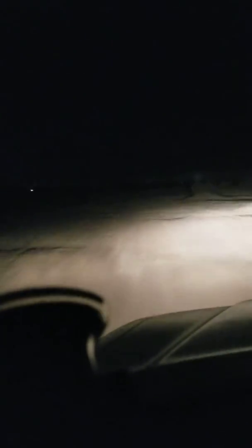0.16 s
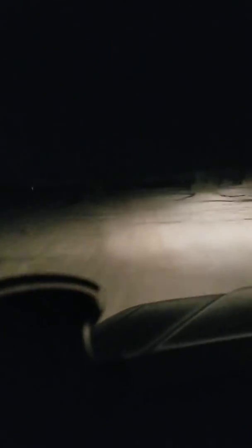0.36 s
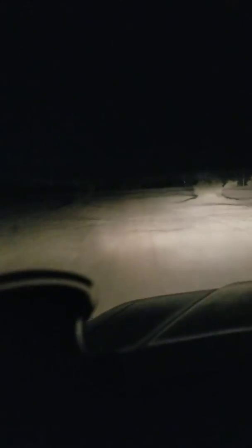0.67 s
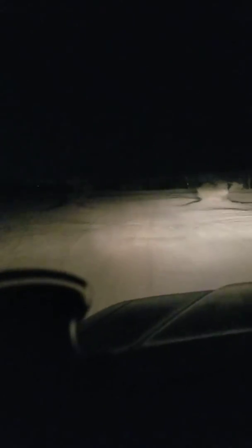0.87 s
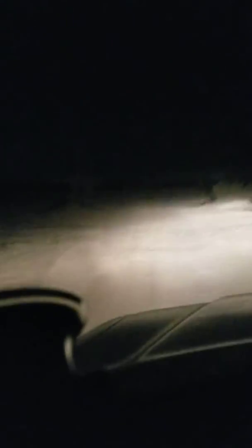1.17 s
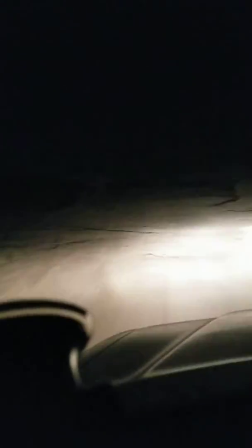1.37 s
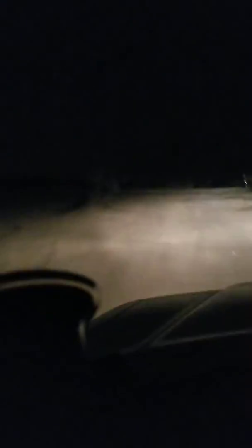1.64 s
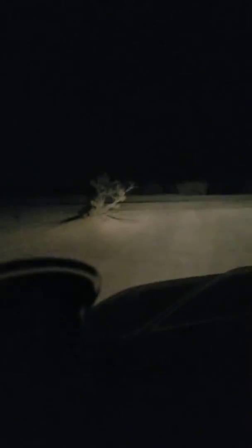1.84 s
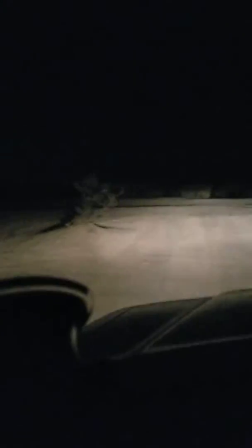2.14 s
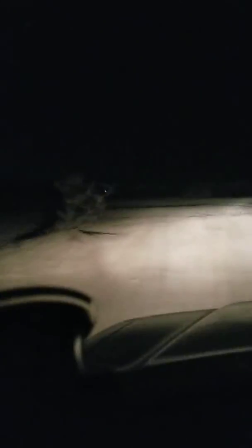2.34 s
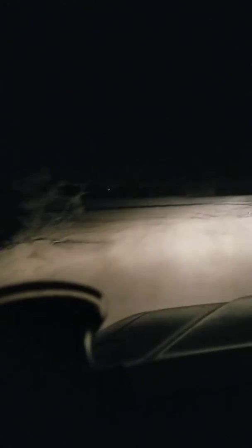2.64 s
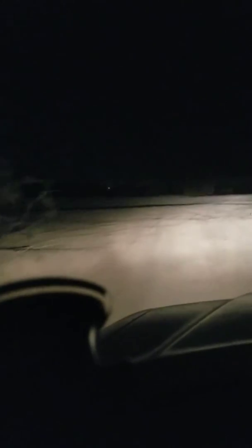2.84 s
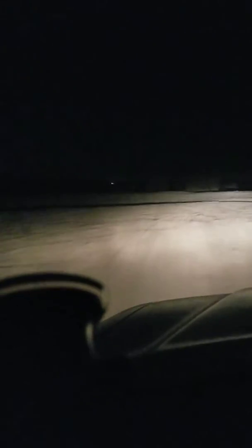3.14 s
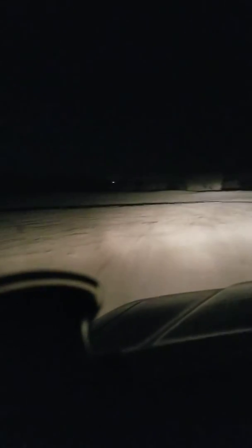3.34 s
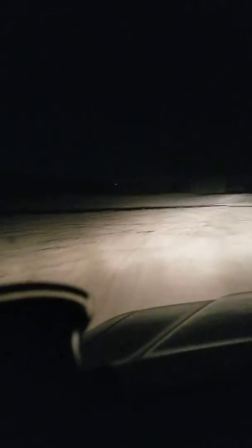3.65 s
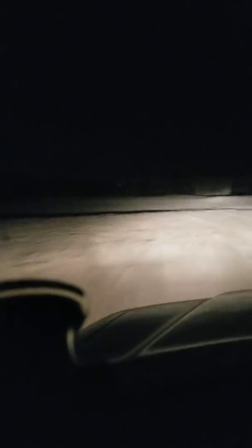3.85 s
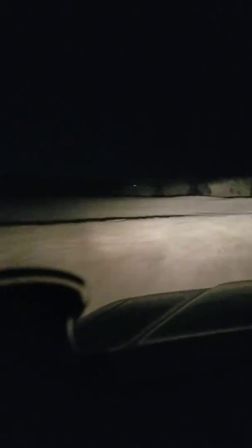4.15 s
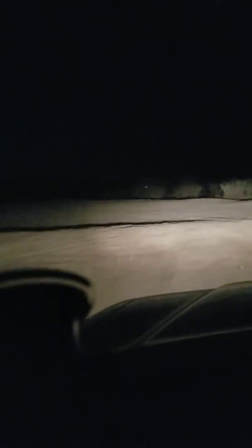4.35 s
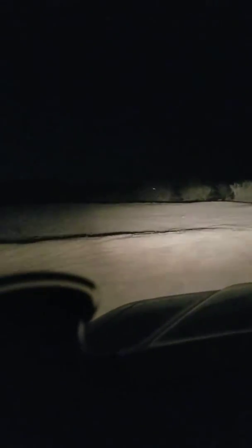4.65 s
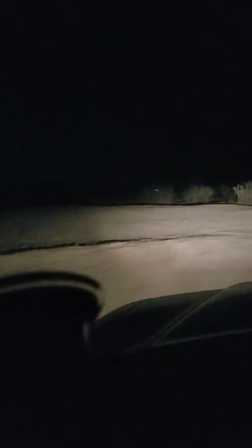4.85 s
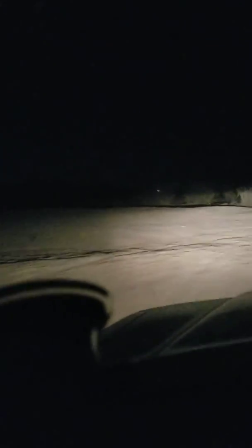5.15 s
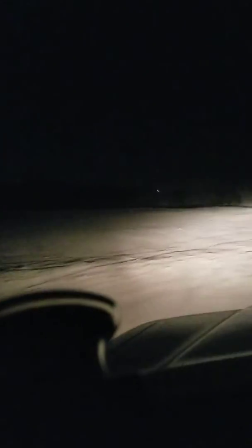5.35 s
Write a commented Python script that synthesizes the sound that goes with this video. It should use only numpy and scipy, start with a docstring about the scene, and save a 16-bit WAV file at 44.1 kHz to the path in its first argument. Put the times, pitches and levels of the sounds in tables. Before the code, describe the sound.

Low booming cabin rumble of a car jolting over ruts and stones, with faint grit crunch, trim rattles and small thuds.

```python
"""Inside a car rolling over a rough dirt road, heard on a phone near the windscreen.
Ruts make the cabin boom, stones drum through the tyres, pebbles thud and grit crunches under the floor.
These are showers of random impacts, coloured by the cabin and made louder in the ruts.
Bumps swing panels as damped tones, and the suspension clunks as dull noise bursts with a short ring.
Loose trim knocks and ticks as filtered bursts, a small metal part rings thinly, and cloth rustles as noise."""
import sys
import numpy as np
from scipy import signal
from scipy.fft import rfft, irfft, next_fast_len
from scipy.io import wavfile
from scipy.ndimage import uniform_filter1d

SR = 44100
rng = np.random.default_rng(int(sys.argv[2]) if len(sys.argv) > 2 else 0)


def put_to_file(sound):
    """Save the sound as 16-bit audio at rate SR, in the file named by the first command-line argument."""
    columns = np.atleast_2d(sound).T  # one column per channel
    safe = np.clip(columns, -1, 1)
    whole_steps = np.round(safe * 32767)
    wavfile.write(sys.argv[1], SR, whole_steps.astype(np.int16))


N = 242991
TIME = np.arange(N) / SR
SIZE = next_fast_len(N + SR // 2, real=True)  # with room for sounds to ring out
FREQ = np.maximum(np.arange(SIZE // 2 + 1) * SR / SIZE, 1)
TOP_HZ = 15900  # the phone passes nothing much above this


def undb(db):
    """Decibels to gain."""
    return 10 ** (np.asarray(db) / 20)


def unit(x):
    """Scale to an rms of one."""
    return x / np.sqrt(np.mean(np.abs(x) ** 2))


def over_hz(points):
    """Points joined by straight lines on a log-frequency axis."""
    hz, value = np.transpose(points)
    return np.interp(np.log(FREQ), np.log(hz), value)


def peaks_db(modes):
    """The peaks that resonances add to whatever shakes them."""
    return sum(db / (1 + (2 * (FREQ - hz) / width) ** 2) for hz, width, db in modes)


def through(x, response):
    """Filter by a frequency response."""
    return irfft(rfft(x, SIZE) * response, SIZE)[..., :N]


def causal(db):
    """Response with these levels that rings only after the blow."""
    cepstrum = irfft(np.log(undb(db)))
    half = len(cepstrum) // 2
    # fold the part before the blow onto the part after it
    cepstrum[1:half] *= 2
    cepstrum[half + 1:] = 0
    return np.exp(rfft(cepstrum))


def walk(rate):
    """Random levels that wander about `rate` times a second, with an rms of one."""
    hold = max(int(SR / rate), 2)
    steps = np.repeat(rng.standard_normal(N // hold + 1), hold)
    return unit(uniform_filter1d(steps, hold)[:N])


def add(out, start, sound):
    """Mix a sound in at a time."""
    first = max(int(start * SR), 0)
    part = out[..., first:first + sound.shape[-1]]
    part += sound[..., :part.shape[-1]]


def stones(rate, spread_db, cap=4):
    """Random impacts of uneven size, `rate` a second on average, as two unrelated pushes."""
    hit = rng.random(N) < rate / SR
    size = undb(spread_db * np.minimum(rng.exponential(size=N), cap))
    return hit * size * rng.standard_normal((2, N))


# resonances of the cabin: pitch_hz, width_hz, boost_db
CABIN_MODES = [(98.2, 11.3, 4.5), (174.5, 20, 1), (324, 69, -1), (384.4, 15, 3), (564, 23, 2.5)]
# which microphone hears more: pitch_hz, left_minus_right_db
LEAN = [(40, 1.1), (110, 1), (200, 3.2), (500, 4.1), (1500, 5.5), (3000, 0), (4800, 5.5), (7000, 3),
        (11000, 1), (15000, 4.4)]
# how alike the two microphones hear: pitch_hz, likeness (0-1)
LIKENESS = [(40, 1), (110, 0.94), (250, 0.85), (420, 0.86), (560, 0.53), (720, 0.16), (950, 0.092),
            (1300, 0.22), (2600, 0.17), (8000, 0.055)]


def cabin(pair, colour):
    """Colour a pair of pushes; long waves reach both microphones alike, short ones do not."""
    alike = np.clip(over_hz(LIKENESS), 0, 1)
    response = causal(over_hz(colour) + peaks_db(CABIN_MODES))
    mid, side = through(pair, response * np.sqrt([1 + alike, 1 - alike]))
    lean_db = over_hz(LEAN) / 2
    return through(np.array([mid + side, mid - side]), undb([lean_db, -lean_db]))


def swells(table, axis, attack_s, release_s):
    """Summed power of events that rise, hold until their length is over and die away."""
    power = np.zeros(N)
    for row in table:
        age = TIME - row[0]
        rise = np.clip(age / attack_s, 0, 1)
        fall = np.exp(-np.maximum(age - row[-1], 0) / release_s)
        power += (undb(row[axis]) * rise * fall) ** 2
    return power


# roughness of the road, as the level of the steady shaking: time_s, level_db
ROAD = [(0.0, -16.5), (0.24, -19.5), (2.12, -22), (2.26, -20.5), (3.57, -24.5), (3.99, -22.5),
        (5.13, -27.5), (5.45, -25.5)]


def road_level():
    """Shaking by the steady road in dB, joined by straight lines in time."""
    rows = np.array(ROAD)
    return np.interp(TIME, rows[:, 0], rows[:, 1])


RUT_ATTACK_S, RUT_RELEASE_S = 0.011, 0.048
# the wheels cross a rut or a stony patch: start_s, boom_db, drum_db, grit_db, length_s
RUTS = [(.04, -28, -24.5, -70, 0.23), (.27, -20, -23.5, -46, 0.13), (.44, -24, -27, -45.5, 0.073),
        (.67, -27.5, -20.5, -44.5, 0.078), (.75, -41, -28.5, -56, 0.07), (.85, -23, -25, -70, 0.049),
        (1.04, -22, -39, -44.5, 0.099), (1.31, -19.5, -27, -75, 0.076), (1.44, -25, -24, -51, 0.057),
        (1.56, -35, -22, -61, 0.045), (1.68, -44, -39, -48, 0.3), (1.96, -47, -49, -39, 0.056),
        (2.05, -19, -49, -42, 0.015), (2.12, -25, -26, -63, 0.039), (2.3, -52, -19.5, -46, 0.091),
        (2.43, -25, -28, -52, 0.042), (2.6, -25, -29.5, -77, 0.16), (2.72, -23.5, -34, -46, 0.091),
        (2.97, -23.5, -31.5, -53, 0.13), (3.14, -31.5, -56, -51.5, 0.18), (3.52, -27.5, -36.5, -55, 0.19),
        (3.76, -45, -24.5, -51.5, 0.15), (3.95, -25, -23, -59, 0.19), (4.33, -23.5, -25.5, -58, 0.11),
        (4.5, -27, -30, -55.5, 0.15), (4.78, -23.5, -30, -68, 0.05), (5.17, -27, -40, -55, 0.061),
        (5.33, -26.5, -35, -46, 0.054), (5.46, -24, -30, -46.5, 0.11)]


def with_ruts(steady_db, axis):
    """Level in dB of the steady road with the surges of the ruts on top."""
    return 10 * np.log10(undb(steady_db) ** 2 + swells(RUTS, axis, RUT_ATTACK_S, RUT_RELEASE_S))


def rumble(colour, level_db, rate, spread_db, even_s):
    """Impacts shake the body; their own ups and downs are evened out so the road sets the level."""
    shake = cabin(stones(rate, spread_db), colour)
    power = uniform_filter1d(np.mean(shake, axis=0) ** 2, max(int(even_s * SR), 2))
    return shake / np.sqrt(power + 1e-18) * undb(level_db)


BOOM_DB = -4.5  # against the steady shaking
# tone colour of the cabin boom: pitch_hz, relative_level_db
BOOM = [(12, -52.5), (22, -8), (34, 5), (60, 5.5), (80, 6.5), (125, 2.5), (160, -28), (280, -120)]


def cabin_boom(road_db):
    """Ruts shake the whole body, and the cabin booms in the deep bass."""
    return rumble(BOOM, with_ruts(road_db + BOOM_DB, axis=1), rate=600, spread_db=1, even_s=0.051)


DRUM_DB = -8  # against the steady shaking
# tone colour of the tyre drumming: pitch_hz, relative_level_db
DRUM = [(59, -28), (100, -1.5), (177, -1.5), (242, -12.5), (316, -16), (351, -26), (392, -22.5),
        (520, -38.5), (680, -56), (1140, -120)]


def tyre_drumming(drum_db):
    """Stones drum through the tyres, above the boom in pitch."""
    return rumble(DRUM, drum_db, rate=1100, spread_db=1.02, even_s=0.047)


PEBBLE_DB, NOMINAL_DRUM_DB = -46, -27  # the thuds have the first level when the drumming has the second
PEBBLE_DB_PER_DB = 0.28  # how the thuds grow with the drumming
# tone colour of the pebbles: pitch_hz, relative_level_db
PEBBLES = [(150, -26), (260, 1), (330, 9), (450, 3.5), (580, -6.5), (750, -12), (1300, -32.5), (3000, -71)]
# stony stretches where pebbles roar under the floor: start_s, level_db, length_s
STONY = [(.02, -38, .07), (.27, -36, 0.13), (.8, -43, .08), (1.26, -35, 0.02), (2.31, -37.5, 0.16),
         (2.72, -41.5, .1), (4.03, -41, 0.12), (4.34, -41.5, 0.058)]


def pebbles(drum_db):
    """Pebbles thud under the treads, harder where the tyres drum; on stony stretches they merge into a roar."""
    thuds = unit(cabin(stones(rate=260, spread_db=1.6), PEBBLES))
    thud_db = PEBBLE_DB + PEBBLE_DB_PER_DB * (drum_db - NOMINAL_DRUM_DB)
    roar = unit(cabin(stones(rate=700, spread_db=2.5), PEBBLES))
    stony_power = swells(STONY, axis=1, attack_s=RUT_ATTACK_S, release_s=RUT_RELEASE_S)
    return roar * np.sqrt(stony_power) + thuds * undb(thud_db)


SMOOTH_ROAD_DB, GRIT_DB = -24.5, -23  # at this shaking the steady grit lies GRIT_DB against it
GRIT_DB_PER_DB = 0.92  # how the grit grows with the shaking
# tone colour of the grit: pitch_hz, relative_level_db
GRIT = [(350, -4.5), (480, 1), (620, 1.5), (800, -2.5), (930, 1), (1150, -7.5), (1350, -5.5), (1700, -10.5),
        (2500, -15), (3200, -20), (4600, -19.5), (6000, -24.5), (7600, -25.5), (8800, -37), (12000, -30)]


def gravel(road_db):
    """Grit crunches unevenly under the tread, harder on rough ground and in the ruts."""
    crunch = unit(cabin(stones(rate=6000, spread_db=-1.5), GRIT))
    steady_db = SMOOTH_ROAD_DB + GRIT_DB + GRIT_DB_PER_DB * (road_db - SMOOTH_ROAD_DB)
    uneven_db = 1.07 * walk(rate=68) + 0.96 * walk(rate=14)
    return crunch * undb(with_ruts(steady_db, axis=3) + uneven_db)


CLOTH_DB = -63.5  # the rustle at rest
SWAY_ATTACK_S, SWAY_RELEASE_S = .04, .11
# tone colour of the rustle: pitch_hz, relative_level_db
RUSTLE = [(2500, 1), (4800, 3), (7500, 2), (8800, -4), (11000, 4), (15800, 1)]
# the car sways and cloth shifts: start_s, level_db, length_s
SWAYS = [(.09, -54, 0.14), (.25, -52.5, 0.085), (.44, -51, 0.032), (1.05, -62, .04), (1.22, -57, 0.082),
         (1.52, -53.5, 0.1), (1.87, -59, 0.21), (2.24, -57, 0.15), (2.37, -54, 0.26), (2.68, -57, 0.14),
         (2.91, -63, 0.068), (3.16, -56.5, 0.045), (3.86, -56, 0.24), (4.42, -60.5, 0.098),
         (4.67, -55.5, 0.19), (4.835, -50.5, 0.11), (4.98, -54.5, 0.22), (5.18, -56, 0.15),
         (5.43, -50, 0.032)]
# cloth sliding on a seat: middle_s, level_db, length_s, pitch_hz
SLIDES = [(0.248, -59, 0.43, 4800), (1.903, -54, 0.1, 4700), (2.44, -60.5, 0.16, 4900),
          (3.292, -61, 0.12, 4400), (3.834, -60.5, 0.37, 5900), (4.73, -64, 0.81, 4600)]


def cloth():
    """Cloth rustles as the car sways; slides hiss in a narrow band and near its octave."""
    sway_power = swells(SWAYS, axis=1, attack_s=SWAY_ATTACK_S, release_s=SWAY_RELEASE_S)
    sway = np.sqrt(undb(CLOTH_DB) ** 2 + sway_power)
    rustle = unit(cabin(stones(rate=42000, spread_db=2.5), RUSTLE)) * sway * undb(1.5 * walk(rate=26))
    for middle, db, length, hz in SLIDES:
        band = 1 / (1 + ((FREQ - hz) / 450) ** 2)
        band += undb(-17) / (1 + ((FREQ - 2.1 * hz) / 900) ** 2)
        hiss = unit(through(rng.standard_normal((2, N)), band))
        swell = undb(db) * np.exp(-(2 * (TIME - middle) / length) ** 2)
        rustle = rustle + swell * hiss * undb([[2.5], [-2.5]])  # stronger on the left
    return rustle


# thin rings of a jolted small metal part: start_s, level_db, pitch_hz, time_to_fall_60_db_s
CHINK = [(4.861, -53, 12130, .35), (4.861, -60, 12600, .5), (4.861, -60, 11190, .4),
         (4.861, -64, 13150, .8), (5.3, -66, 13150, .4)]


def chink():
    """A thin metallic ring that dies slowly."""
    out = np.zeros(N)
    for start, db, hz, t60 in CHINK:
        add(out, start, undb(db - 60 * TIME / t60) * np.sin(2 * np.pi * hz * TIME))
    return out


# bumps that swing a body panel: start_s, level_db (before a common cut), pitch_hz, length_s
BUMPS = [(.36, -6.5, 177.3, 0.041), (1.063, -2, 61.6, 0.084), (1.56, -9, 175, 0.063),
         (2.304, -0.5, 137, 0.023), (2.335, -8.5, 176.6, 0.14), (2.722, -6.5, 58, 0.1),
         (2.733, -1.5, 107, 0.024), (3.998, -18, 428, 0.019), (4.012, -10.5, 115.5, 0.062),
         (4.373, -9.5, 101, 0.033), (5.343, -11.5, 211.7, 0.036), (5.367, -24, 220.4, 0.14)]


def bumps():
    """Each bump swings a panel: a quick swell and a damped fall."""
    out = np.zeros(N)
    t = TIME[:SR // 2]
    for start, db, hz, length in BUMPS:
        age = t / (length * 0.35)  # the swing is widest when this reaches one
        swing = (age * np.exp(1 - age)) ** 2
        add(out, start, undb(db - 7.5) * swing * np.sin(2 * np.pi * hz * t))
    return out * undb([[.8], [-.8]])  # slightly stronger on the left


CONTACT_RISE_S = .002  # how fast the contacts build up


def chatter(length, tail_db, tail_s, grain_db):
    """A burst of tiny contacts and its short cabin echo, with the energy of unit rms over its length."""
    t = TIME[:SR // 8]
    grains = np.repeat(rng.standard_normal(len(t)), SR // 2000)[:len(t)]  # about 2000 a second
    burst = (1 - np.exp(-t / CONTACT_RISE_S)) * np.exp(-(t / length) ** 2) * undb(grain_db * grains)
    echo = undb(tail_db) * np.exp(-t / tail_s) * (1 - np.exp(-2 * t / length))
    sound = (burst + echo) * rng.standard_normal((2, len(t)))
    return unit(sound) * np.sqrt(length * SR / len(t))


CLUNK_RISE_S, CLUNK_RING_S = 0.0015, 0.0092  # the ring swells and dies away
CLUNK_SAG, CLUNK_SAG_S = .07, .012  # a struck panel starts this share sharp and relaxes in this time
# tone colour of the blows: pitch_hz, relative_level_db
CLUNK = [(150, 7), (300, 11), (420, 6.5), (600, -2.5), (1000, -1.5), (1500, -13.5), (2400, -31),
         (5000, -62)]
# suspension clunks, each ringing a floor panel: start_s, blow_db, length_s, pitch_hz, ring_peak_db (on the left)
CLUNKS = [(0.15, -56, .006, 308, -34), (0.215, -35, 0.0039, 750, -34), (0.365, -34, 0.036, 294, -20.5),
          (0.393, -36, 0.006, 586, -30), (0.77, -41, 0.029, 546, -31.5), (1.553, -37, 0.038, 310, -22.5),
          (1.727, -41, 0.019, 613, -32), (2.348, -34, 0.0049, 556, -27), (2.4, -46, 0.0096, 557, -32),
          (2.447, -44, 0.012, 296, -19.5), (2.729, -43, 0.015, 684, -32.5),
          (2.834, -34.5, 0.012, 274, -22.5), (3.989, -32.5, 0.019, 570, -32),
          (4.32, -31.5, 0.0047, 636, -44), (4.358, -56, 0.018, 307, -24.5), (4.791, -42, 0.012, 315, -26),
          (5.027, -30.5, 0.0037, 440, -48), (5.315, -29.5, 0.033, 426, -27)]


def clunks():
    """The suspension strikes its rubber stops: dull blows through the floor, each with a short solid ring."""
    blows, rings = np.zeros((2, N)), np.zeros(N)
    t = TIME[:SR // 8]
    swell = (1 - np.exp(-t / CLUNK_RISE_S)) * np.exp(-t / CLUNK_RING_S)
    swell = swell / swell.max()
    relaxing = t + CLUNK_SAG * CLUNK_SAG_S * (1 - np.exp(-t / CLUNK_SAG_S))
    for start, db, length, hz, ring_db in CLUNKS:
        blow = chatter(length, tail_db=-13, tail_s=.025, grain_db=4)
        add(blows, start, undb(db) * blow)
        add(rings, start, undb(ring_db) * swell * np.sin(2 * np.pi * hz * relaxing))
    return unit(cabin(blows, CLUNK)) * np.std(blows) + rings * undb([[0], [-4]])


SPOT_DB = 2  # how much the struck spot changes the colour


def rattles(table, dry, ringing, blow_db, tail_db, tail_s, grain_db):
    """A loose part strikes its seat once and chatters on; the contact's hardness picks the pitch region."""
    out, count = np.zeros((2, N)), 2 * (SR // 10)
    hz = np.maximum(np.fft.rfftfreq(count, 1 / SR), 1)
    # shorten both responses to the span of one rattle
    dry, ringing = (unit(rfft(irfft(response, SIZE)[:count])) for response in (dry, ringing))
    for start, db, length, centre_hz, focus_db, pan_db in table:
        length = max(length, .001)
        force = chatter(length, tail_db, tail_s, grain_db)
        force[:, SR // 1000] += undb(blow_db) * np.sqrt(length * SR)  # the first blow, at 1 ms
        # light touches clatter drily; hard blws set the whole panel ringing
        share = np.interp(db, [-40, -32], [.3, 1])
        mix = (1 - share) * dry + share * ringing
        octaves = np.minimum(np.abs(np.log2(hz / centre_hz)), 2)
        # every blow lands on another spot, which favours other resonances
        spot_db = SPOT_DB * np.interp(hz, np.geomspace(300, TOP_HZ, 40), rng.standard_normal(40))
        colour = unit(mix * causal(focus_db * octaves + spot_db))
        sound = irfft(rfft(force, count) * colour, count) / np.hypot(1, undb(blow_db))
        add(out, start, sound * undb([[db + pan_db / 2], [db - pan_db / 2]]))
    return out


BENDING_S = .0075  # the most that the bass of a knock lags behind its treble
# tone colours of knocks and of ticks: pitch_hz, relative_level_db
KNOCK = [(400, -12), (900, 12.5), (1500, 1.5), (2400, 0), (3050, -3), (3800, -5.5), (4600, -2),
         (5400, -7.5), (6500, -11), (7800, -10), (9000, -18), (15000, -14.5)]
TICK = [(1500, -2), (3000, 0.5), (4000, 7.5), (5200, 2.5), (6300, -1), (7500, -0.5), (9000, -9),
        (11000, -0.5), (13500, 0.5), (16000, 1)]
# resonances of the panels and of the small hard parts: pitch_hz, width_hz, boost_db
TRIM_MODES = [(700, 160, 4), (1000, 90, 13), (1319, 110, 4), (1650, 240, 3), (2030, 110, 10),
              (2420, 170, 9), (2615, 130, 10), (3170, 90, 3), (3480, 240, 5), (4250, 190, 10),
              (4560, 190, 7), (5450, 400, 5)]
TICK_MODES = [(3400, 400, 4), (4200, 300, 2), (4720, 300, 3), (5400, 700, 3), (6300, 300, 4),
              (8970, 300, 8), (12900, 500, 4)]
# loose trim knocking, then small hard parts ticking and scraping, both with the columns:
# start_s, level_db, length_s, centre_hz, change_db_per_octave (away from the centre), left_minus_right_db
KNOCKS = [(0.216, -42, .002, 900, -7, 0), (0.335, -51, .012, 2800, -10, 2),
          (0.365, -49.5, 0.027, 2600, -10, 0), (0.469, -45, .012, 2500, 0, 9),
          (0.836, -40, .012, 2670, -4, 4.5), (1.116, -45, 0.007, 3520, -25, 5),
          (1.127, -48, 0.013, 3350, -18, 2), (1.241, -40, .008, 1620, -12, 7.5),
          (1.537, -48, 0.013, 4080, -7, 4), (1.979, -40, 0.0079, 3320, -7, 2),
          (1.987, -39, .006, 3000, -6, 5), (2.011, -37, 0.0087, 3200, -5, -1),
          (2.062, -42.5, .0065, 2180, -3, 10), (2.206, -28.5, 0.0083, 3160, -5.5, 4),
          (2.224, -38, .011, 1690, -10, 8), (2.2645, -38.5, 0.0093, 2740, -21, 1),
          (2.341, -43.5, .0078, 2480, -14, -1), (2.425, -44, .0049, 2580, -8, 0),
          (2.478, -41.5, 0.021, 2500, -2.5, 5), (2.509, -38.5, 0.012, 2580, -5.5, 2.5),
          (2.585, -46.5, 0.017, 2250, -3, 8), (2.714, -46, 0.019, 3520, -4.5, 2),
          (2.808, -41, 0.0048, 900, -7, 1), (3.034, -48.5, 0.0089, 4160, -4, 12),
          (3.563, -54.5, 0.013, 2400, -3, 17), (3.996, -37.5, 0.018, 1830, -6, 1),
          (4.3215, -40, .003, 1100, -9, 2), (4.618, -48.5, .01, 1300, -9, 6),
          (4.856, -36, 0.0066, 2700, -17, 6), (4.860, -31.5, 0.0072, 2470, -8, 4),
          (4.871, -40, 0.011, 1800, 0, 9), (4.903, -37.5, 0.0022, 4200, -10, -1),
          (4.907, -46.5, .016, 3500, -6, -1), (4.909, -44, 0.018, 1100, -5, 9),
          (5.317, -42.5, 0.015, 1380, -13, 0)]
TICKS = [(0.619, -47.5, 0.0098, 8800, -4, 4), (0.681, -40, 0.0088, 9500, -3, 4),
         (0.7495, -41, 0.014, 9200, -5, 3), (0.811, -48, 0.0094, 8950, -3, 1),
         (1.005, -54, 0.0037, 10000, -13, 6), (1.087, -51, 0.013, 8000, -11, 5),
         (1.244, -47, .007, 8000, -5, 6), (1.4195, -34, 0.0017, 5600, -6.5, -2),
         (1.536, -51.5, .0037, 5500, -4, -13), (2.068, -47.5, .0061, 8000, -12, 1),
         (2.092, -44, .0024, 13000, -15, 0), (2.207, -51, 0.0079, 6530, -15, 1),
         (2.266, -51, .005, 7400, -21, 4), (2.479, -47, 0.0091, 10900, -14, 8),
         (2.587, -52, .0059, 10100, -7, 5), (3.032, -52, 0.0092, 9000, -5, 1),
         (3.249, -55, .003, 11000, -11, 3), (3.697, -53, .0032, 10000, -10, -3),
         (4.158, -54, 0.0066, 9900, -7, 8), (4.214, -54, .0037, 12000, -12, 13),
         (4.29, -47, .0069, 13000, -10, 7), (4.312, -45.5, 0.0036, 10700, -6, 5),
         (4.694, -41.5, 0.0021, 7450, -7, 15.5), (4.857, -43, 0.011, 10000, -8, -2)]


def trim():
    """Plastic panels knock with their own resonances; small hard parts tick with higher ones."""
    # bending waves travel slower at low pitch, so each knock falls from treble to bass
    lag_s = BENDING_S * np.clip(np.sqrt(1000 / FREQ) - .47, 0, 1)
    bending = np.exp(-2j * np.pi * np.cumsum(lag_s) * SR / SIZE)
    clatter = causal(over_hz(KNOCK)) * bending
    panel = causal(over_hz(KNOCK) + peaks_db(TRIM_MODES)) * bending
    tick = causal(over_hz(TICK) + peaks_db(TICK_MODES))
    knocks = rattles(KNOCKS, clatter, panel, blow_db=-10, tail_db=-14, tail_s=.018, grain_db=3)
    ticks = rattles(TICKS, tick, tick, blow_db=-17, tail_db=-15, tail_s=.012, grain_db=3)
    return knocks + ticks


# how much later the sound reaches the left microphone: pitch_hz, lag_s
LEFT_LAG = [(400, 0), (600, .0003), (1000, .00035), (2600, .00025), (5000, .00021)]


def scene():
    """Road noise with the knocks and rattles on top, reaching the left microphone a little later."""
    road_db = road_level()
    drum_db = with_ruts(road_db + DRUM_DB, axis=2)
    road = cabin_boom(road_db) + tyre_drumming(drum_db) + pebbles(drum_db) + gravel(road_db)
    left, right = road + cloth() + chink() + bumps() + clunks() + trim()
    later = np.exp(-2j * np.pi * FREQ * over_hz(LEFT_LAG))
    return np.array([through(left, later), right])


def record(dry):
    """The phone cuts the top with a steep low-pass filter."""
    return signal.sosfilt(signal.ellip(10, .2, 80, TOP_HZ, fs=SR, output="sos"), dry)


dry = scene()
out = record(dry)
put_to_file(out)
```